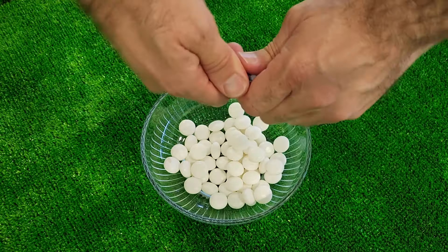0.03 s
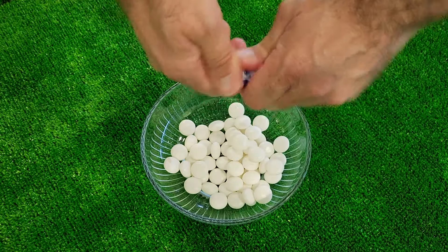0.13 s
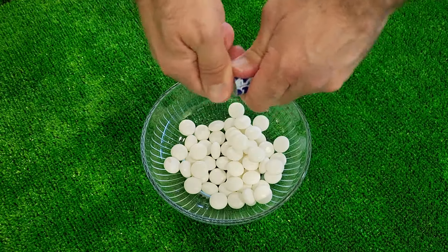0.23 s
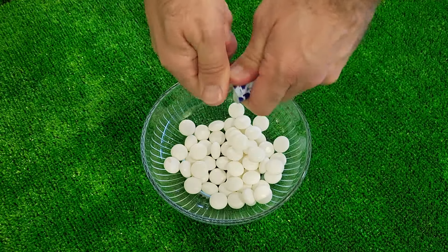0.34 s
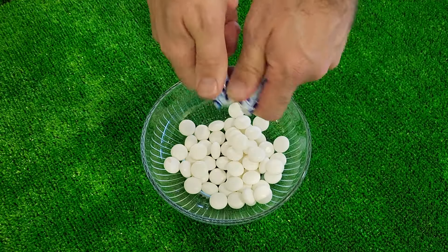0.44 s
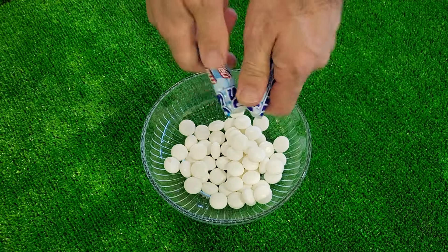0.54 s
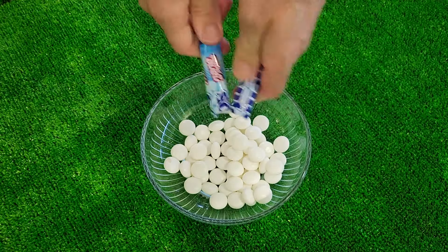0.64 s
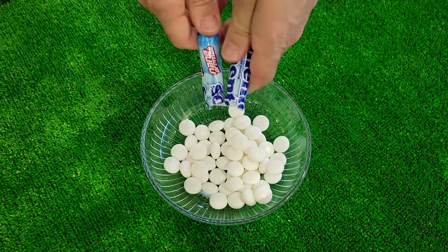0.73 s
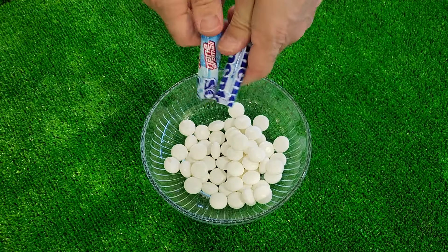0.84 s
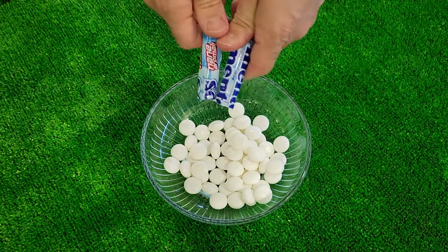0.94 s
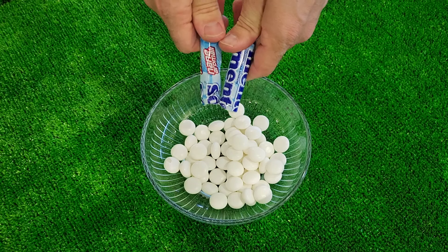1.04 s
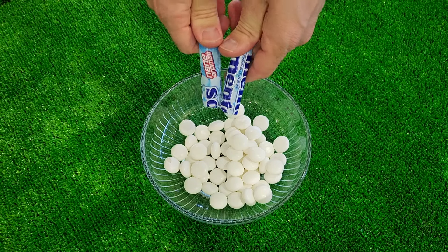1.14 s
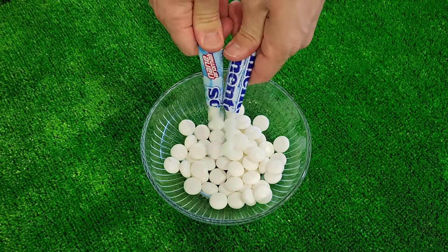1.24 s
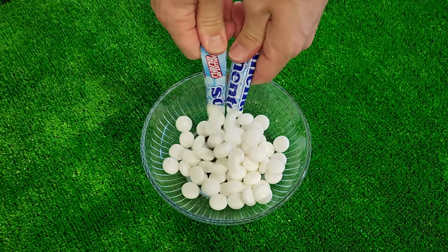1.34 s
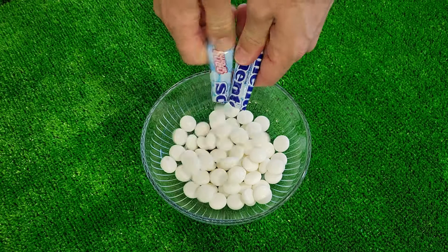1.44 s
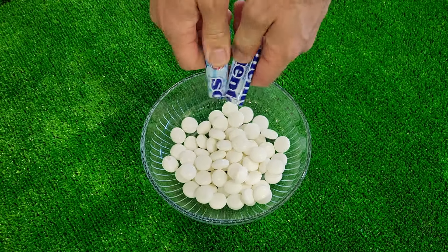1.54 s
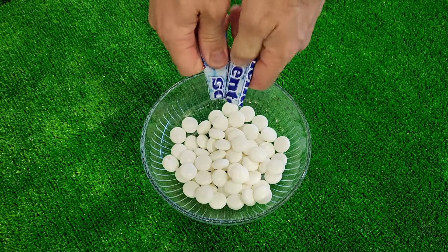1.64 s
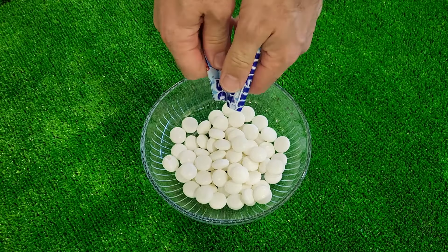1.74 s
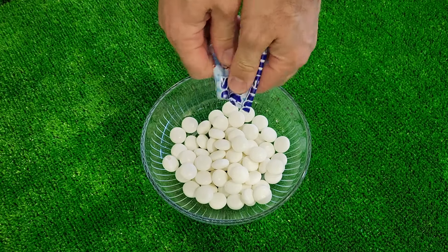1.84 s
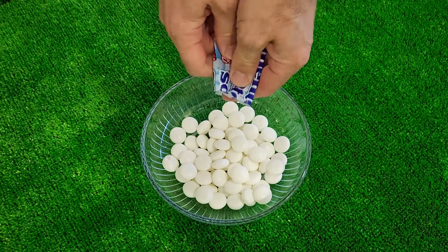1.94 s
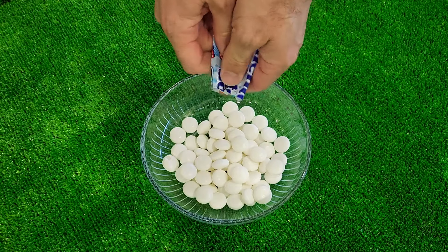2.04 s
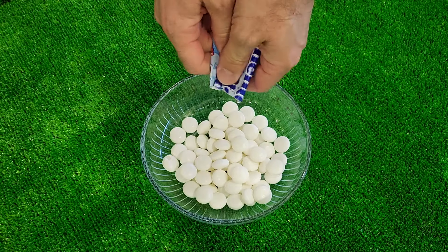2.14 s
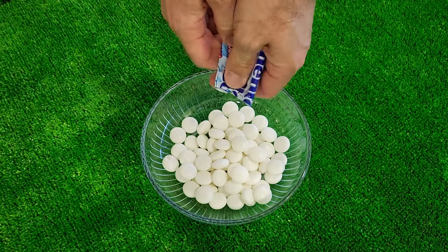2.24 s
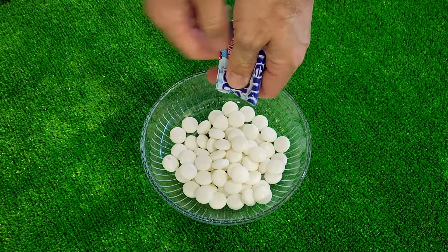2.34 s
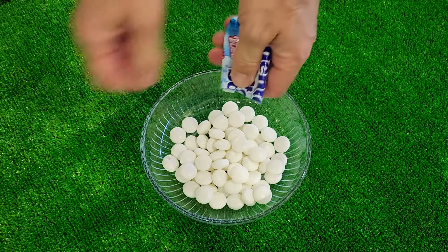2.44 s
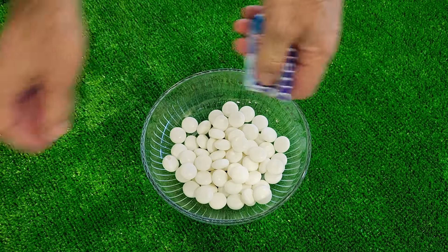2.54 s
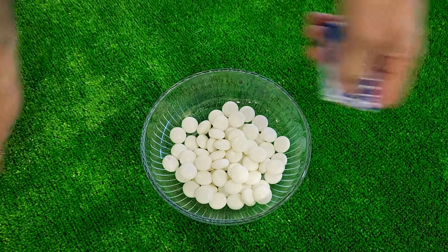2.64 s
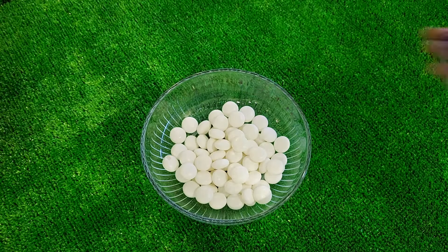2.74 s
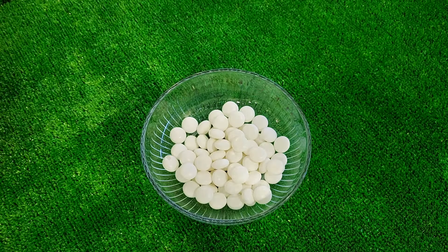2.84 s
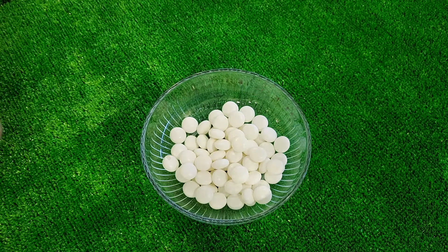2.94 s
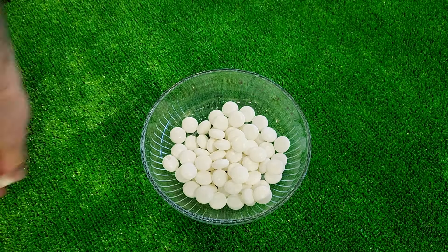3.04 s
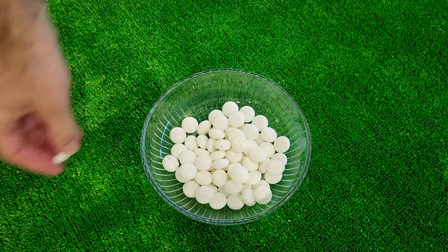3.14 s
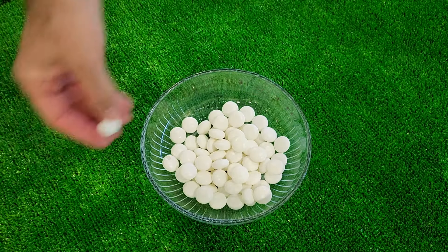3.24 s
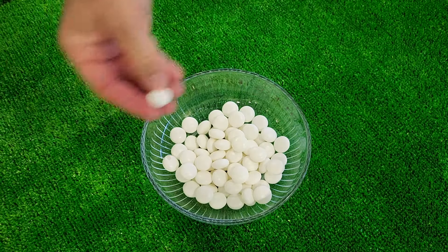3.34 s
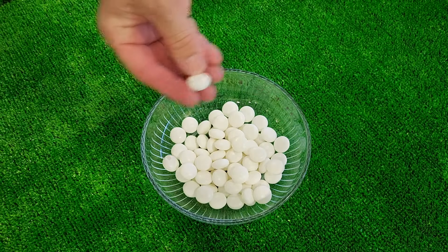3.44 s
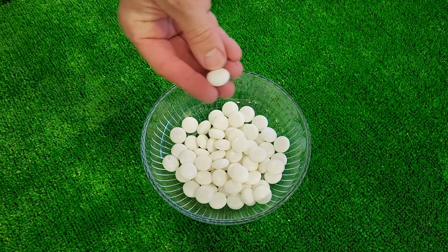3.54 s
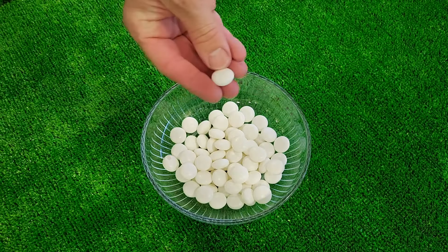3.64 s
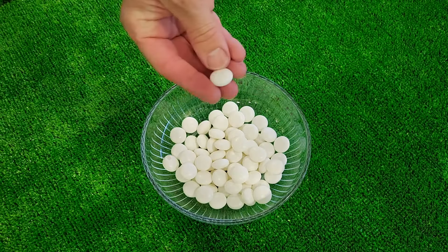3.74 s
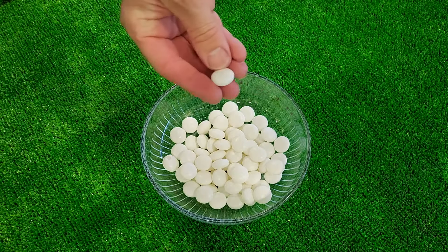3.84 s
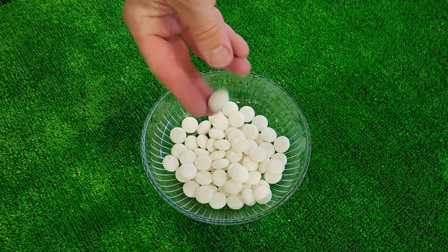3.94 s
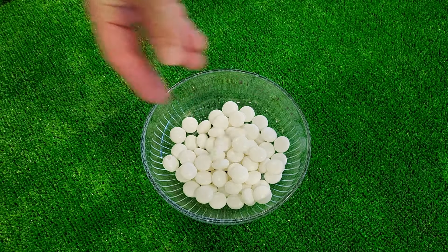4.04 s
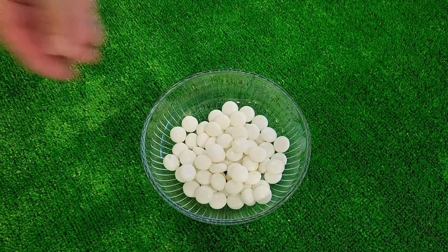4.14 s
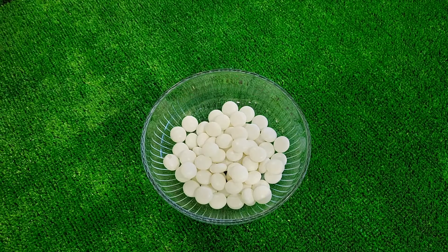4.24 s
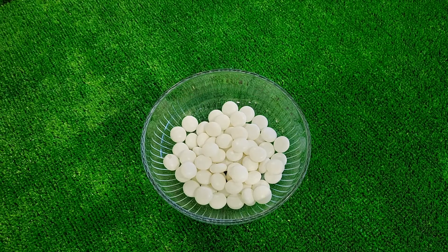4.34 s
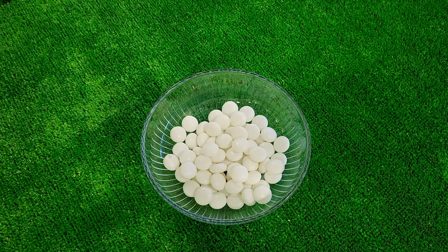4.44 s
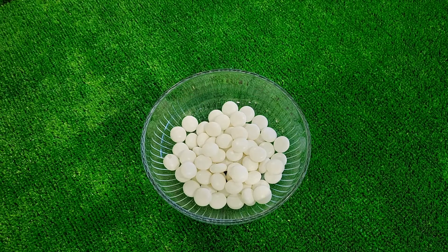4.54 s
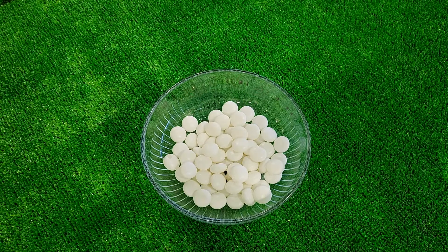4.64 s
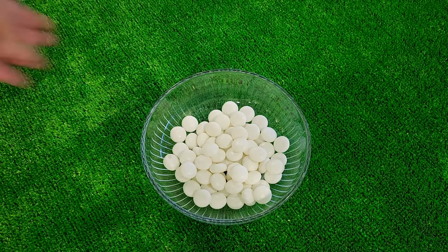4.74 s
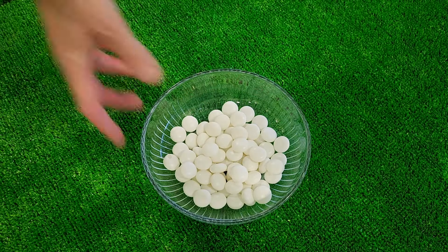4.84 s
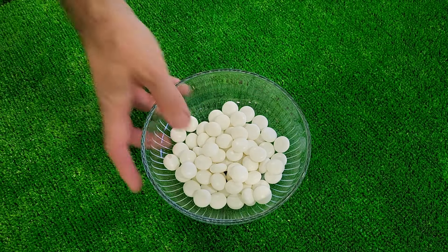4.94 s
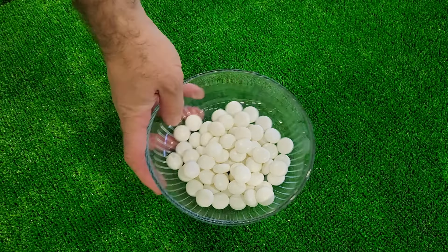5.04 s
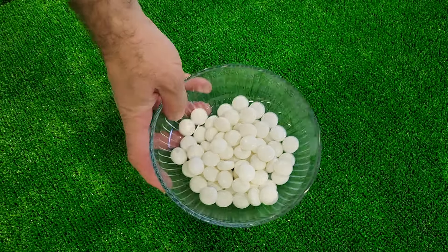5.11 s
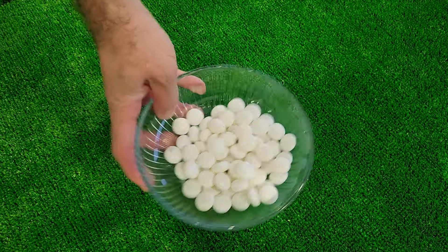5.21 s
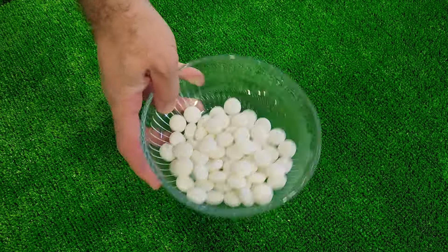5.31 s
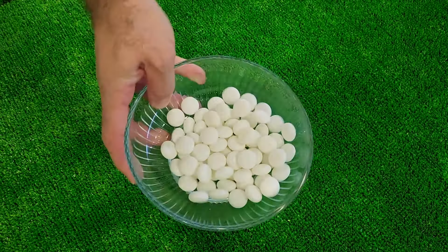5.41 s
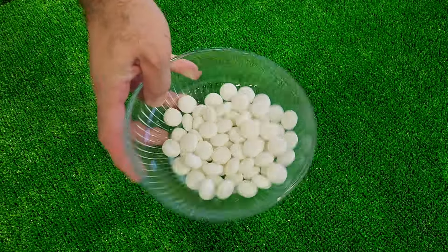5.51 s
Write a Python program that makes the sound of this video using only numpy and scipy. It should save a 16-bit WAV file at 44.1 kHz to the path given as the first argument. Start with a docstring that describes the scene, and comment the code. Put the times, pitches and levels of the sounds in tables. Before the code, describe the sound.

A live, hard-walled kitchen heard very close in stereo, over a wavering low hum, soft rumble and faint hiss. At about 0.15 s paper rolls break open with a very loud, dry crack and quick slap echo. Light rustles and small creases follow until a stronger crackle near 1.2 s. From 1.25 s hard mints pour in a loud rush onto a heap in a glass bowl: dry sugary clacks, dull thumps and bright, high glass ringing, thinning by about 1.65 s. Wrappers crinkle, with strong pops around 1.7-1.9 s, fading by 2.5 s; another rustle and crease comes at 2.9 s, small ones near 3.4 s. At 4.06 s one mint lands with a hard clack and tiny bounces, then faint ticks up to 4.6 s. Around 5.0 s fingers brush and skid on the rim; from 5.15 s the swirled mints rattle and scrape, damped by the hand, until the end near 5.6 s.

```python
"""A bare, echoing kitchen; a glass bowl holding a heap of hard mints, close to a two-port microphone.
Two paper rolls of mints snap open and empty onto the heap; the wrappers crackle and are put aside.
One last mint is dropped in, then a hand takes hold of the bowl and swirls it.
Each contact is a noise crack that also kicks the bowl's decaying modes; paper is creases and grainy noise.
Wavering sine hum, rumble and hiss lie behind; a limiter and clipping bound the loudest peaks."""
import sys
import numpy as np
from scipy import signal
from scipy.fft import rfft, irfft, next_fast_len
from scipy.io import wavfile
from scipy.ndimage import uniform_filter1d, minimum_filter1d

SR = 44100
rng = np.random.default_rng(int(sys.argv[2]) if len(sys.argv) > 2 else 0)


def unload_wav(signal):
    """Save mono or channel-first audio to the path in sys.argv[1] as 16-bit WAV at rate SR, clipped to [-1, 1]."""
    wavfile.write(
        sys.argv[1],
        SR,
        np.round(np.clip(np.atleast_2d(signal).T, -1, 1) * 32767).astype(np.int16),
    )


N = 245637
T = np.arange(N) / SR  # time [s]

# All table levels are relative: each source adds its own overall gain.
# single mint strikes, from hard knocks to light taps:
# (time [s], level [dB], glass ring [dB], share on the free wall [0-1])
STRIKES = [(1.2572, 10, -4, 0.1), (1.2715, 14, 6.5, 0.07), (1.342, 9, 6, 0.6), (1.385, 7.5, 10.5, 0.07),
           (1.428, 10, 4, 0), (1.458, 2, 8, 0.08), (1.524, 6, 9.5, 0.16), (1.553, -8, 6, 0),
           (1.5945, -2.5, 6.5, 1), (1.619, -4, 4, 0.76), (4.058, 13, 3, 0.18), (4.0755, -8.5, 6, 0.3),
           (4.082, -6.5, 8, 0), (4.101, -13, 4.5, 0), (4.1245, -8.5, 5.5, 0), (4.1955, -9, -8, 0),
           (4.2262, -16, -1, 0.18), (4.6018, -14.5, -4.5, 1), (4.622, -22, -17, 0.68), (5.1752, -11, 5, 0),
           (5.2955, 5.5, 4.5, 0.1), (5.394, 3, 0, 0), (5.420, 11, 2, 0), (5.438, 7.5, 1, 0.5),
           (5.5595, 2, -5, 0)]
# bowl modes, damped by the mints lying on the glass: (frequency [Hz], t60 [s], struck through the heap [dB],
# struck on the free wall [dB], change once a hand holds the bowl [dB], left minus right [dB])
BOWL_MODES = [(1094, 0.076, -19, -20.5, -12, 3), (2046, 1.5, -54, -19, -6, 0), (2053, 1.2, -56, -25, -6, 0),
              (3391, 1.0, -48, -18, -6, 0), (4963, .7, -36, -14, -6, 0), (5604, 0.058, -2.5, -16, -3.5, 5),
              (5664, 0.15, -4.5, -17.5, -3, 2), (5725, 0.49, -6.5, -16.5, -12, 1),
              (5814, 0.11, -4, -10, -5, 5.5), (7420, 0.06, 6.5, -13, 4, 4),
              (7496, 0.24, -2, -13.5, -7.5, 4), (7553, 0.54, -9.5, -16.5, -10, -0.5),
              (8130, 0.044, -3, -15, -1.5, 0), (8947, 0.12, -4.5, -12.5, 0, -1),
              (9163, 0.07, -6, -2, 0, -10), (8980, .12, -7, 2, 6, -1), (10030, 0.068, -17.5, -6, 6.5, -8.5),
              (10830, .1, -11.5, -10.5, 2.5, -8.5), (10957, 0.15, -9.5, -14, -6, -3),
              (11920, 0.092, -5.5, -22.5, -5.5, -1), (12980, 0.36, -11, -24.5, -2.5, -2),
              (13630, 0.14, -12.5, -18.5, -5, 0.5), (14280, .1, -23.5, -30, 4, -5.5)]
# mints landing hard enough to thump the bowl on its mat: (time [s], level [dB])
THUMPS = [(1.28, -15.5), (1.313, -14.5), (1.333, -10.5), (1.383, -17), (1.412, -16), (1.458, -18.5),
          (4.058, -13)]
# single wrapper creases giving way, loud and faint: (time [s], level [dB], pitch [Hz], crispness [dB])
CREASES = [(0.0163, -23, 2900, 5.5), (.0643, -27, 6600, -2), (0.105, -19.5, 7000, 1),
           (0.396, -18, 3140, -2), (.571, -32, 2650, 9), (.797, -39.5, 4020, 5.5), (0.9673, -28.5, 6200, 0),
           (1.0083, -26, 5100, 0), (1.0783, -34, 6000, 2.5), (1.1007, -23.5, 6050, 3),
           (1.1416, -16, 6640, 3.5), (1.1902, -22.5, 5060, 2), (1.209, -16, 3094, 1.5),
           (1.243, 1, 3000, -3), (1.670, -4.5, 2960, -20), (1.692, -5, 2300, -10), (1.7808, -21.5, 2404, 5),
           (1.8058, 4, 2880, -11), (1.856, -15.5, 2170, -6), (1.9106, -3.5, 2130, -9),
           (1.9301, -19, 3000, 7.5), (2.074, -17, 1232, -10), (2.109, -18, 3160, 1),
           (2.1197, -18, 4190, 4.5), (2.1402, -24, 3020, -1), (2.217, -25.5, 2970, 1.5),
           (2.257, -19.5, 1994, -10), (2.2727, -18, 3397, 2), (2.894, -12.5, 4200, 2), (3.17, -36, 5000, 3),
           (3.3946, -16.5, 1670, 3), (3.5513, -32, 3530, 5)]
# strokes of paper over mints and fingers: (start [s], rise [s], length [s], level [dB], treble [dB])
RUBS = [(0, .01, 0.23, -52, 10), (.14, .02, .33, -49.5, 6), (0.527, 0.037, 0.096, -57.5, 8.5),
        (0.976, 0.11, 0.28, -46, 7), (1.186, 0.069, 0.061, -20.5, 2), (1.657, 0.035, 0.217, -40.5, -6),
        (2.007, 0.11, 0.203, -44, -4), (2.274, 0.0575, 0.253, -58, -10), (2.825, .06, 0.18, -34.5, -3),
        (3.386, 0.014, 0.0144, -40, 2), (3.464, 0.057, .18, -48.5, -2.5)]
# hands brushing the mat and taking hold of the bowl: (start [s], length [s], level [dB])
BRUSHES = [(2.852, .17, -49.5), (4.992, .08, -49.5), (5.14, 0.043, -43.5)]
# colours of noise, all listed as (frequency [Hz], relative density [dB]):
# mint on mint
CLACK_COLOUR = [(100, -17), (300, -23), (600, -23.5), (900, -6), (1300, 2), (2000, -2.5), (3200, -3.5),
                (5000, 1), (7000, 6.5), (9000, 4.5), (11000, -7), (13500, -7.5), (15500, -24)]
# bowl pushed into its mat
THUMP_COLOUR = [(100, -11.5), (230, -4.5), (380, -0.5), (550, 3), (800, -11.5), (1500, -24), (4000, -52)]
# mints sliding on glass
SLIDE_COLOUR = [(300, -29), (600, -25), (800, 3), (1150, -1.5), (1700, -7.5), (3000, -5), (8000, 0),
                (15500, -39)]
# rolls breaking open
SNAP_COLOUR = [(100, -25), (300, -12.5), (800, -19.5), (1600, -14), (2700, -5.5), (4000, 2), (6000, 4),
               (8200, 0), (10000, -16.5), (15500, -7)]
# crisp tick of a crease
CRISP_COLOUR = [(200, -30), (800, -9.5), (2000, -3), (5000, 6.5), (8500, 5.5), (11000, -5.5), (15500, -5.5)]
# body of rubbing paper
RUB_COLOUR = [(200, -19), (650, -16.5), (1100, -1), (2000, 10), (3500, 9), (6500, -3.5), (9000, -19.5),
              (15000, -31)]
# treble of rubbing paper
RUB_TOP_COLOUR = [(2000, -30), (6000, 1.5), (8500, 2.5), (12000, -1.5), (15500, -4.5)]
# brushing skin
SKIN_COLOUR = [(250, -16.5), (500, -7.5), (680, 8), (950, -6.5), (1300, -6), (1900, 1.5), (2700, -3),
               (4500, -11), (9000, -22.5), (15500, -38.5)]
# fingertips skidding on the rim
SKID_COLOUR = [(500, -24.5), (1100, -6), (1500, 1), (2000, 0), (2700, -13), (7000, -10.5), (15500, -38.5)]
# background hiss
HISS_COLOUR = [(150, 4.5), (250, 0), (350, 1.5), (500, -12.5), (800, -17.5), (1500, -26.5), (3000, -25.5),
               (6500, -28), (7500, -13), (8400, -18.5), (9500, -48), (15500, -60)]
# background rumble
RUMBLE_COLOUR = [(15, -10.5), (31, 3), (45, 1), (70, -2.5), (108, 3.5), (135, 0.5), (158, -13), (182, -1),
                 (215, -11), (300, -22), (450, -59)]
# kitchen reverberation: (frequency [Hz], t60 [s])
KITCHEN = [(300, 0.2), (1000, 0.96), (2500, 0.638), (5000, 0.76), (8000, 0.51), (12000, 0.19),
           (16000, 0.16)]
# level of the low hum, as of distant traffic, and its rumble:
# (time [s], lower tone [dB], upper tone [dB], rumble [dB])
HUM = [(0.0, -52, -37, -46), (0.62, -45, -46.5, -45.5), (0.73, -47, -32.5, -44), (1.58, -39.5, -44, -43),
       (1.86, -46, -32.5, -41.5), (2.08, -49, -39, -38.5), (2.57, -44, -50, -41.5),
       (2.62, -36, -37.5, -42.5), (2.82, -42.5, -59.5, -42), (2.9, -39, -43, -40.5),
       (3.13, -31.5, -54, -36), (3.27, -29, -35.5, -38.5), (3.46, -31.5, -53, -35),
       (3.86, -30, -33.5, -35.5), (3.91, -31.5, -42, -36), (4.3, -41.5, -27, -33), (5.27, -49, -33.5, -44),
       (5.57, -43.5, -36.5, -39)]
# centre frequencies of the hum: (lower tone [Hz], upper tone [Hz])
HUM_HZ = (60.3, 82.2)

PORT_LAG = 3  # samples by which the right port hears shared sound later
TICK_SIZE = 4096  # samples in one short burst
GRIP_S = 5.0  # a hand holds the bowl from here on
# the rolls empty in a rush that thins out as they drain
POUR_S, POUR_RISE_S, POUR_LENGTH_S, POUR_STOP_T60_S = 1.25, 0.077, .37, .17
POUR_DB, POUR_SAG_DB_PER_S, POUR_RING_DB = -18.5, 52, 3.5
# the swirl gathers speed, then keeps the heap rolling and sliding
SWIRL_S, SWIRL_RISE_S, SWIRL_DB, SWIRL_RING_DB = 5.15, 0.1374, -26.5, 5.5
SLIDE_RISE_S, SLIDE_DB = 0.079, -21
# small creases while paper is handled: level relative to the rubbing, middle pitch, crispness
CRINKLE_DB, CRINKLE_HZ, CRINKLE_CRISP_DB = 16, 3220, 2.5
RUB_SAG_DB_PER_S, RUB_T60_S = 25.5, .2
BRUSH_RISE_S, BRUSH_T60_S = 0.025, 0.11
# fingertips skid on the rim as they close on it
SKID_RISE_S, SKID_LENGTH_S, SKID_DB, SKID_T60_S = 0.021, 0.0664, -42, 0.21


def mint_contacts():
    """Single strikes, the pour and the swirled heap, in order of time."""
    flow = undb(POUR_DB) * gesture(POUR_S, POUR_RISE_S, POUR_LENGTH_S, POUR_STOP_T60_S, POUR_SAG_DB_PER_S)
    poured = tumble(flow, POUR_RING_DB, rate=190, spread_db=24)
    swirl_flow = undb(SWIRL_DB) * swirl(SWIRL_RISE_S) ** 2
    swirled = tumble(swirl_flow, SWIRL_RING_DB, rate=170, spread_db=25)
    contacts = np.vstack([STRIKES, poured, swirled])
    return contacts[np.argsort(contacts[:, 0])]


def tumble(flow, ring_db, rate, spread_db):
    """Random contacts, as rows like STRIKES, whose power follows the flow."""
    chance = rng.random((2048, 2))
    times = (np.arange(len(chance)) + 2 * chance[:, 0]) / rate
    size = undb(spread_db * chance[:, 1])
    size = size / np.sqrt(np.mean(size ** 2) * rate / SR)
    size = size * np.interp(times, T, flow, right=0)
    level_db = 20 * np.log10(size + 1e-9)
    rows = np.column_stack([times, level_db, ring_db + 0 * times, 0 * times])
    return rows[size > .01]  # the faintest are left out


def swirl(rise):
    """Gain of the swirl, which builds up and stays."""
    return np.clip((T - SWIRL_S) / rise, 0, 1)


def clacks(contacts):
    """Sugar on sugar: a dry crack, coloured anew by each pair of mints, and a brief chatter of the heap."""
    out = np.zeros((2, N))
    hz, db = np.transpose(CLACK_COLOUR)
    shapes = []
    for _ in range(24):  # a stock of pairs, used in turn
        pair_colour = np.column_stack([hz, db + 4.5 * rng.standard_normal(len(hz))])
        crack = tick(pair_colour, t60=.007, alike=.7)
        chatter = undb(-6) * tick(CLACK_COLOUR, t60=.04, alike=.5)
        shapes.append(crack + chatter)
    for k, (s, level_db, _, _) in enumerate(contacts):
        add(out, s, undb(level_db + 12.5) * shapes[k % len(shapes)])
    return out


def glass(contacts, port_phase, scatter_db, detune, touch_db):
    """Every contact rings the bowl; random strength and phase per mode stand for where it lands."""
    s, db, ring_db, wall = contacts.T
    wall = np.clip(wall, 0, 1)
    out = np.zeros((2, N))
    at = np.clip(s * SR, 0, N - 1).astype(int)
    gaps = np.minimum(np.diff(at, append=N), SR)  # a ring sounds for 1 s at most before the next contact
    for hz, t60, heap_db, wall_db, held_db, pan_db in BOWL_MODES:
        size, lean, turn, bearing, load = (rng.random((1024, 5))[:len(s)] - .5).T
        place_db = (1 - wall) * heap_db + wall * wall_db
        push_db = db + ring_db + place_db + (s > GRIP_S) * held_db + scatter_db * size
        side_db = (pan_db + scatter_db * lean) / 2
        left = undb(push_db + side_db)
        right = undb(push_db - side_db) * np.exp(-1j * (port_phase + 2 * bearing))
        push = np.exp(2j * np.pi * turn) * np.array([left, right])
        # the shifting heap loads the glass, so the pitch moves a little at every contact
        poles = 2j * np.pi * hz * (1 + detune * load * (1 - wall)) - np.log(1000) / t60
        state = np.zeros(2, complex)
        for start, gap, kick, pole in zip(at, gaps, push.T, poles):
            # a landing mint also takes some of the ringing away
            kicked = state * undb(-abs(touch_db)) + kick
            ring = kicked[:, None] * np.exp(pole * T[:gap + 1])
            out[:, start:start + gap] += ring[:, :-1].imag
            state = ring[:, -1]
    return out


def thumps():
    """The heaviest landings push the whole bowl into its mat."""
    out = np.zeros((2, N))
    for s, db in THUMPS:
        add(out, s, undb(db + 14.5) * tick(THUMP_COLOUR, t60=0.019, alike=1.0))
    return out


def sliding():
    """The swirled heap scrapes and rolls over the ribbed glass: finely grained noise."""
    scrape = grain(size_db=1.0, size=130) * noise(SLIDE_COLOUR, N, alike=0.902)
    return undb(SLIDE_DB) * swirl(SLIDE_RISE_S) * scrape


def snap():
    """The rolls break open with a sharp crack, thrown back by a nearby surface; returns near and room parts."""
    near, far = np.zeros((2, N)), np.zeros((2, N))
    crack = undb(30.0) * tick(SNAP_COLOUR, t60=.011, alike=.8)
    thump = undb(11) * tick(THUMP_COLOUR, t60=0.0083, alike=0.66)
    add(near, .1464, crack + thump)
    add(near, .1547, undb(16.0) * tick(SNAP_COLOUR, t60=0.014, alike=0.23))  # off the surface
    pulse = colour(signal.unit_impulse(512, 64), SNAP_COLOUR)
    add(far, .146, undb(14.5) * np.array([pulse, pulse]))
    return near, far


def creases(rows):
    """Creases buckle: a few cycles of the paper tube and a crisp tick."""
    out, t = np.zeros((2, N)), T[:TICK_SIZE]
    for s, db, hz, crisp_db in rows:
        tube = unit(np.cos(2 * np.pi * hz * t) * fade(t, .0055))
        crisp = undb(crisp_db + 6.5) * tick(CRISP_COLOUR, t60=0.017, alike=0.49)
        pop = np.array([tube, np.roll(tube, PORT_LAG)]) + crisp
        add(out, s, undb(db + 7) * pop)
    return out


def crinkles(handling, rate, spread_db):
    """Random small creases, as rows like CREASES, as strong as the paper is being handled."""
    when, size, pitch = rng.random((512, 3)).T
    times = (np.arange(len(when)) + when) / rate
    handling_db = 20 * np.log10(np.interp(times, T, handling, right=0) + 1e-9)
    db = handling_db + CRINKLE_DB + spread_db * (size - 1)
    hz = CRINKLE_HZ * 2 ** (2 * pitch - 1)  # within an octave either way
    rows = np.column_stack([times, db, hz, CRINKLE_CRISP_DB + 0 * times])
    return rows[db > -60]


def strokes():
    """Gain of the paper's rubbing, for its body and for its treble."""
    each = np.array([undb(db) * gesture(s, rise, length, RUB_T60_S, RUB_SAG_DB_PER_S)
                     for s, rise, length, db, _ in RUBS])
    treble_gain = undb(np.array(RUBS)[:, 4])
    return each.sum(axis=0), treble_gain @ each


def rubbing(body, top):
    """Paper slides in tiny catches, grainier in the treble; skin brushes more softly and lower."""
    catches = grain(size_db=4.5, size=50)
    paper = body * catches ** 0.55 * noise(RUB_COLOUR, N, alike=0.85)
    paper_top = top * catches * noise(RUB_TOP_COLOUR, N, alike=0.45)
    hands = sum(undb(db) * gesture(s, BRUSH_RISE_S, length, BRUSH_T60_S) for s, length, db in BRUSHES)
    skin = hands * noise(SKIN_COLOUR, N, alike=1.0)
    fingertips = undb(SKID_DB) * gesture(GRIP_S, SKID_RISE_S, SKID_LENGTH_S, SKID_T60_S)
    skid = fingertips * grain(size_db=3, size=120) * noise(SKID_COLOUR, N, alike=.6)
    return paper + paper_top + skin + skid


def kitchen(x):
    """Diffuse echo of hard walls, unrelated at the two ports; each band of noise has its own decay."""
    t = T[:SR]
    f = np.fft.rfftfreq(len(t), 1 / SR)
    hz, t60 = np.transpose(KITCHEN)
    wash = rfft(rng.standard_normal((2, len(t))))
    tail = 0
    for band, decay in zip(np.eye(len(hz)), t60):  # overlapping triangular bands
        tail = tail + irfft(wash * np.interp(f, hz, band)) * fade(t, decay)
    tail = unit(tail * np.clip((t - .004) / 0.0033, 0, 1))  # silent for the first 4 ms
    return signal.fftconvolve(x, tail, axes=1)[:, :N]


def background():
    """Two wavering hum tones, a rumble that swells and sinks, and a faint steady hiss."""
    s, *columns = np.transpose(HUM)
    *tone_db, rumble_db = (np.interp(T, s, c) for c in columns)
    hum = 0
    for hz, db in zip(HUM_HZ, tone_db):
        level = undb(db + 3 + 1.6 * walk(6.5))
        hum = hum + level * np.sin(2 * np.pi * hz * T + .5 * walk(3.8))
    rumble = undb(rumble_db + 3) * noise(RUMBLE_COLOUR, N, alike=0.977)
    hiss = undb(-47.5) * noise(HISS_COLOUR, N, alike=0.31)
    return hum + rumble + hiss


def undb(db):
    """Decibels to gain."""
    return 10 ** (np.asarray(db) / 20)


def unit(x):
    """Scale to unit energy per channel, on average."""
    return x / np.sqrt(np.sum(x ** 2) / len(np.atleast_2d(x)))


def add(out, s, sound):
    """Mix a stereo sound in at time s."""
    i = int(np.clip(s * SR, 0, N - 1))
    out[:, i:i + sound.shape[1]] += sound[:, :N - i]


def colour(x, spectrum):
    """Filter by a (frequency [Hz], density [dB]) outline that keeps the power of white noise."""
    hz, db = np.transpose(spectrum)
    f = np.fft.rfftfreq(x.shape[-1], 1 / SR)
    gain = undb(np.interp(np.log(f + 1), np.log(hz), db))
    return irfft(rfft(x) * gain / np.sqrt(np.mean(gain ** 2)), x.shape[-1])


def noise(spectrum, size, alike):
    """Coloured noise at two microphone ports; the shared part reaches the left one first."""
    white = rng.standard_normal((3, next_fast_len(size)))
    shared, *own = colour(white, spectrum)[:, :size]
    alike = np.clip(alike, 0, 1)  # shared part of the power
    both = np.array([shared, np.roll(shared, PORT_LAG)])
    return np.sqrt(alike) * both + np.sqrt(1 - alike) * np.array(own)


def fade(t, t60):
    """Exponential decay by 60 dB in t60 seconds."""
    return np.exp(-np.log(1000) * t / t60)


def tick(spectrum, t60, alike):
    """One short decaying noise burst of unit energy."""
    return unit(noise(spectrum, TICK_SIZE, alike) * fade(T[:TICK_SIZE], t60))


def gesture(start, rise, length, t60, sag=0):
    """Gain of one movement: it rises, holds while sagging by some dB per second, and dies away."""
    t = T - start
    sagging = undb(-sag * np.clip(t - rise, 0, length))
    return np.clip(t / rise, 0, 1) * sagging * fade(np.maximum(t - length, 0), t60)


def grain(size_db, size):
    """Tiny catches of uneven strength, each lasting size samples, as a gain of unit power."""
    strength_db = size_db * np.minimum(rng.exponential(size=N // size + 1), 5)
    catches = np.repeat(undb(strength_db), size)[:N]
    return catches / np.sqrt(np.mean(catches ** 2))


def walk(rate):
    """Slow smoothed random wander, with rate new knots per second."""
    knots = rng.standard_normal(512)
    return uniform_filter1d(np.interp(T * rate, np.arange(len(knots)), knots), int(SR / rate / 2))


def scene():
    """Mints, glass and paper close to the microphone, each sounding into the kitchen."""
    contacts = mint_contacts()
    mints = clacks(contacts) + thumps() + sliding()
    bowl = undb(-16.0) * glass(contacts, port_phase=2.11, scatter_db=10.5, detune=0.0065, touch_db=1.5)
    handling, treble = strokes()
    small_creases = crinkles(handling, rate=65, spread_db=16)
    paper = creases(np.vstack([CREASES, small_creases]))
    crack, crack_far = snap()
    rub = rubbing(handling, treble)
    to_room = undb(-10.5) * mints + undb(-11.5) * bowl + undb(-11.5) * paper + crack_far + undb(-6.0) * rub
    return mints + bowl + paper + crack + rub + kitchen(to_room) + background()


def record(dry):
    """A fast limiter holds peaks to about twice full scale, the rest clips; the top is cut at 15.6 kHz."""
    gain = np.minimum(1, 2.04 / (np.abs(dry).max(axis=0) + 1e-9))
    gain = uniform_filter1d(minimum_filter1d(gain, size=65), size=65)
    clipped = np.clip(dry * gain, -1, 1)
    top_cut = signal.ellip(8, .2, 70, 15600, fs=SR, output="sos")
    return signal.sosfilt(top_cut, clipped)


dry = scene()
out = record(dry)
unload_wav(out)
```